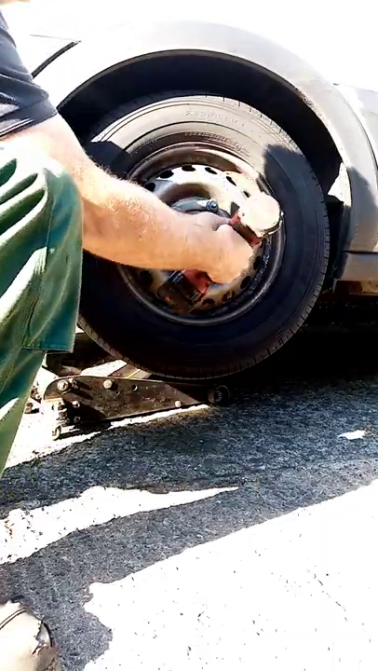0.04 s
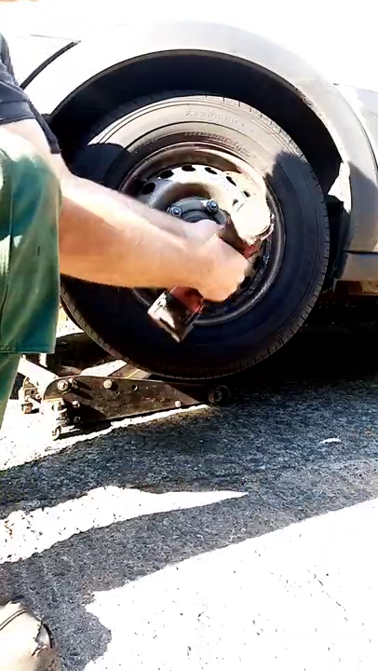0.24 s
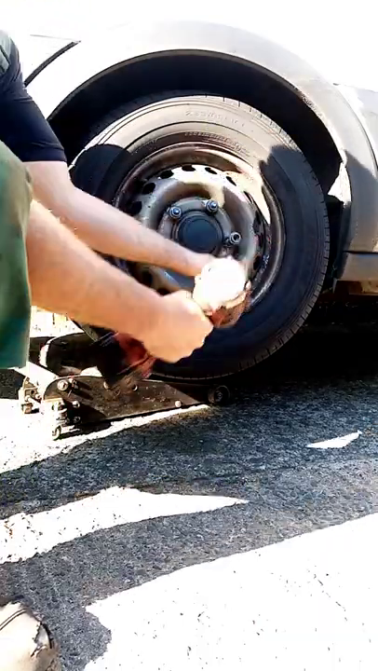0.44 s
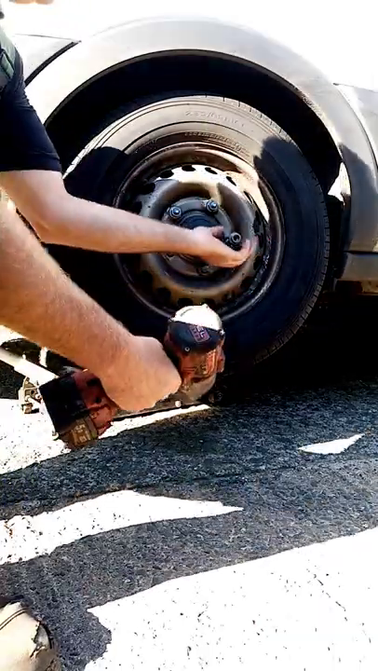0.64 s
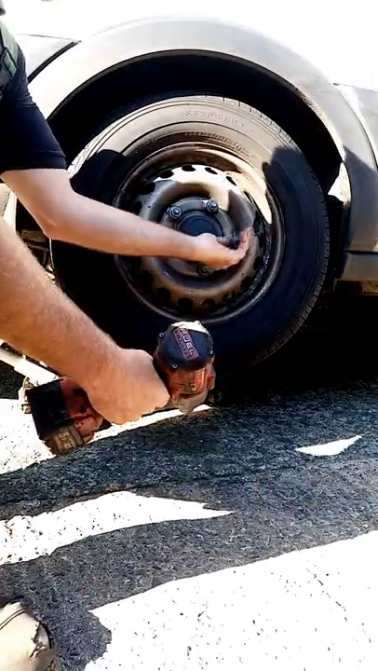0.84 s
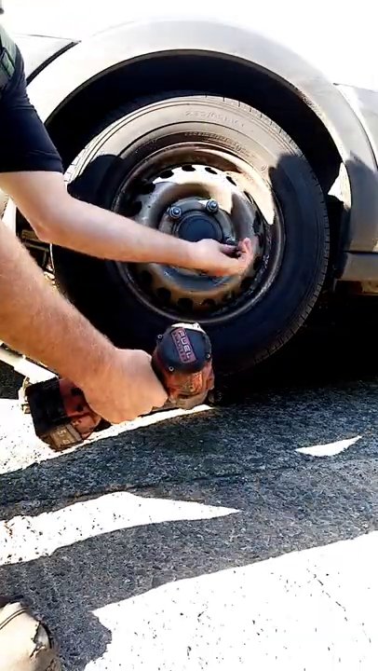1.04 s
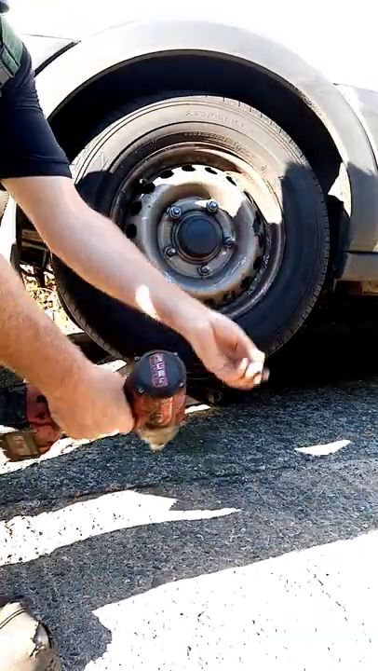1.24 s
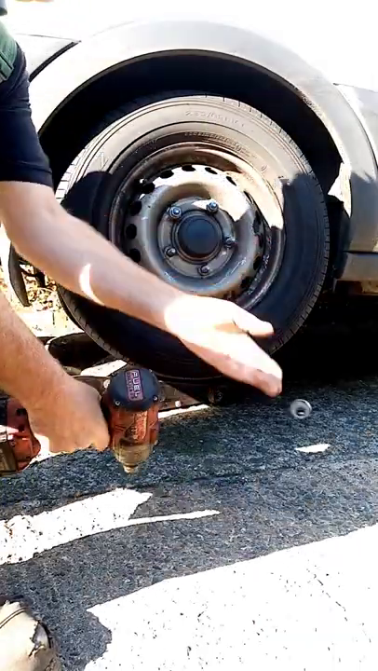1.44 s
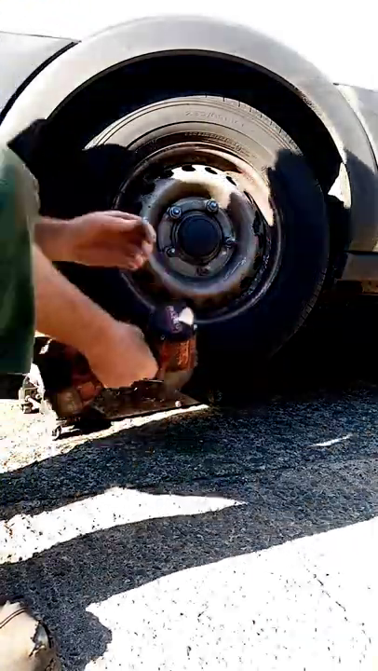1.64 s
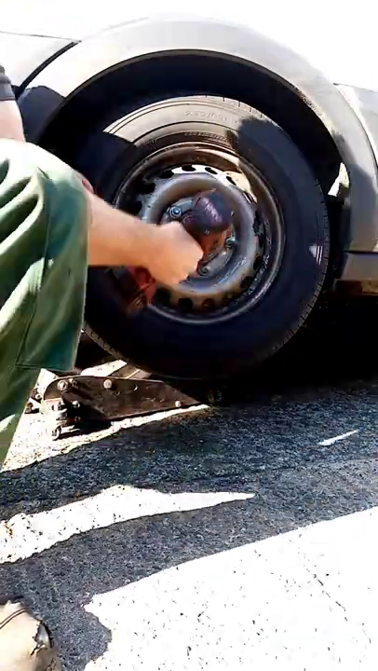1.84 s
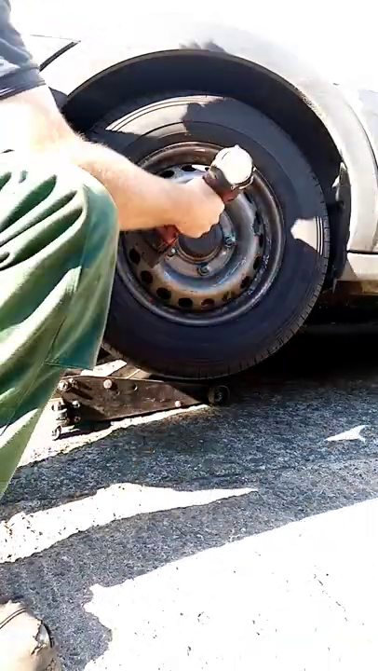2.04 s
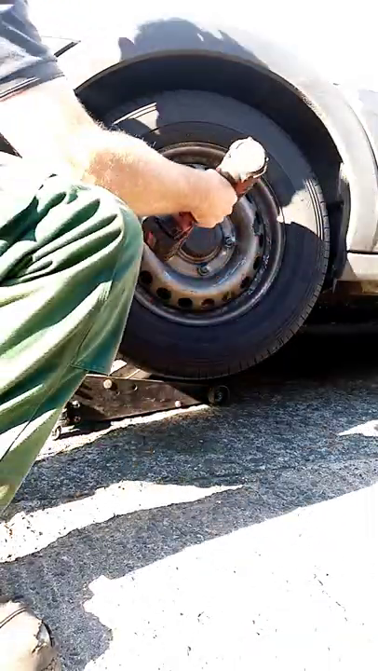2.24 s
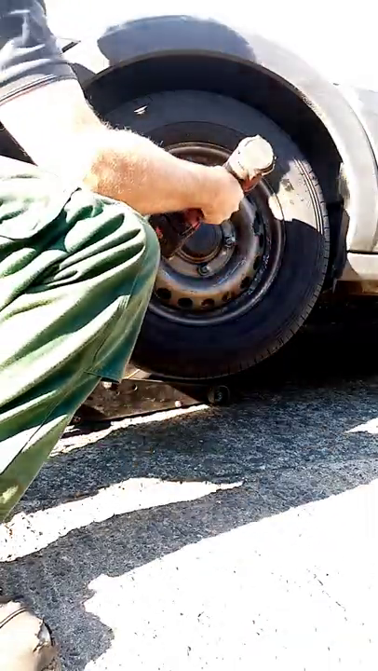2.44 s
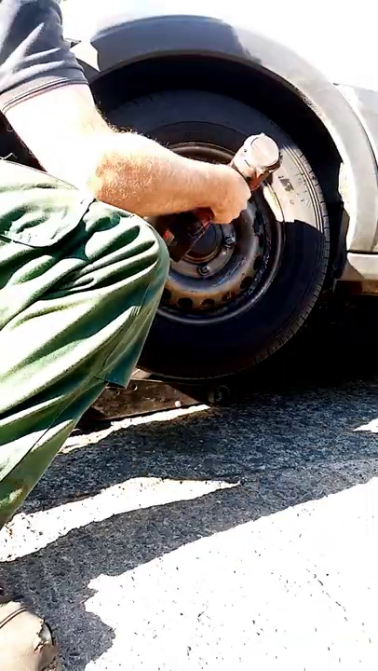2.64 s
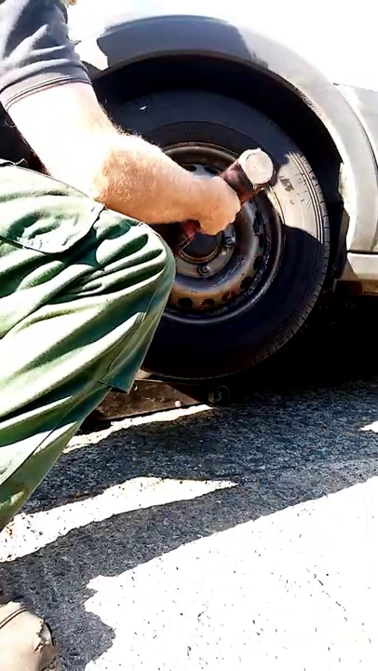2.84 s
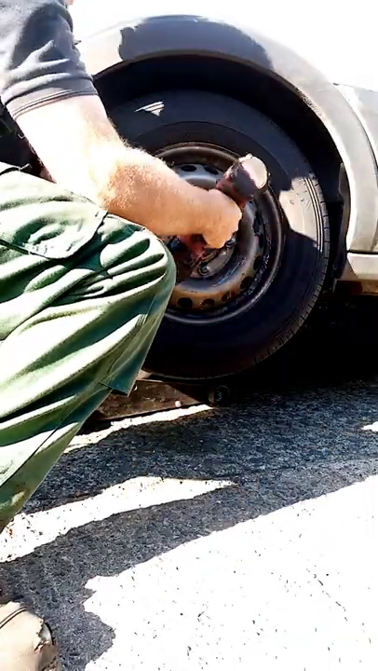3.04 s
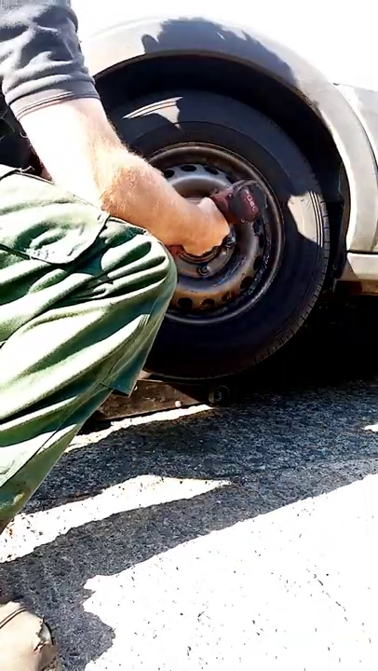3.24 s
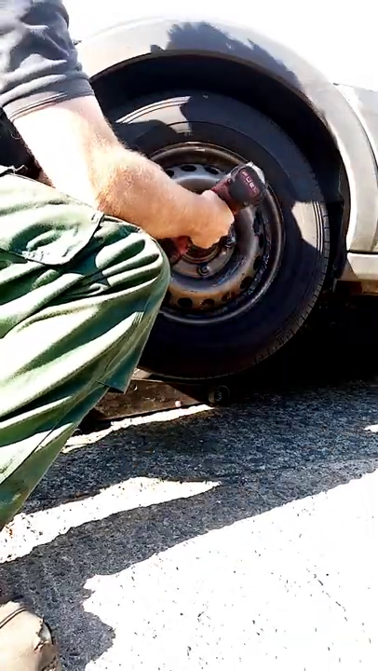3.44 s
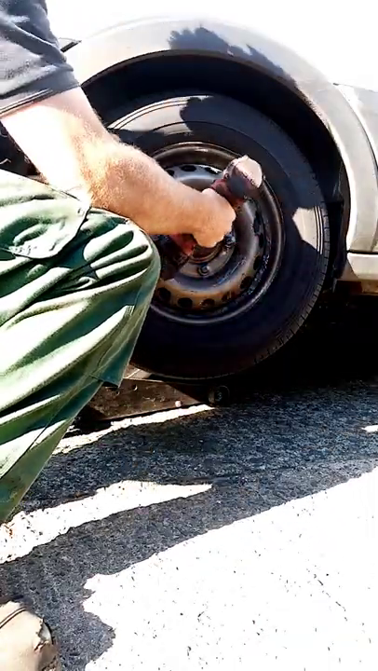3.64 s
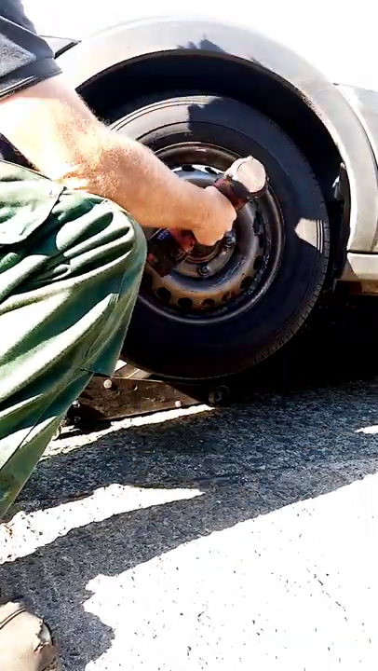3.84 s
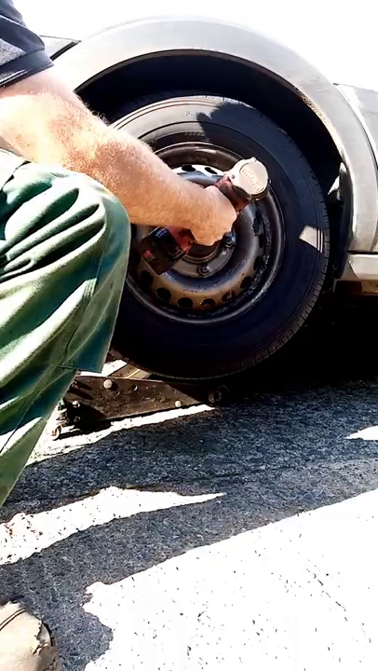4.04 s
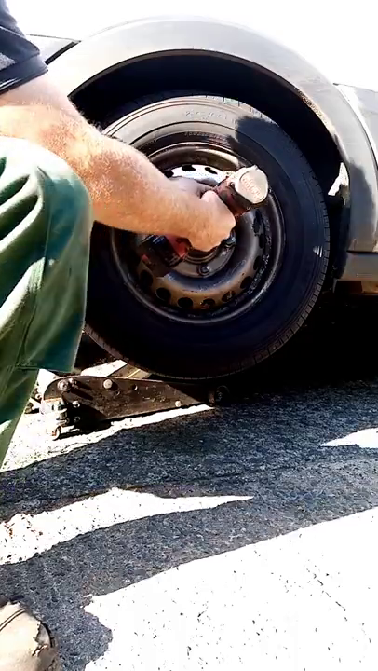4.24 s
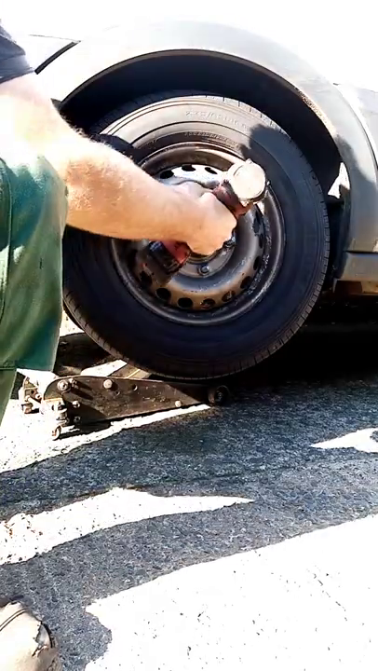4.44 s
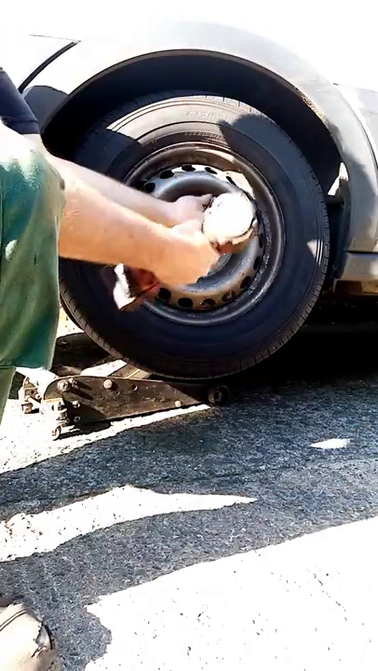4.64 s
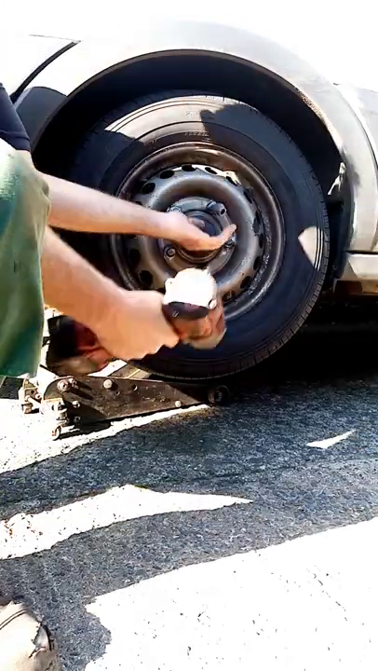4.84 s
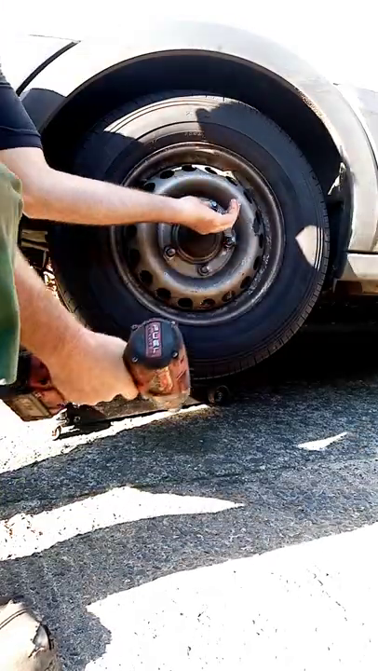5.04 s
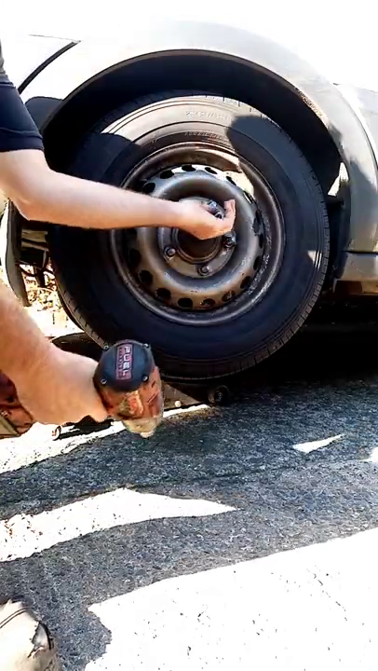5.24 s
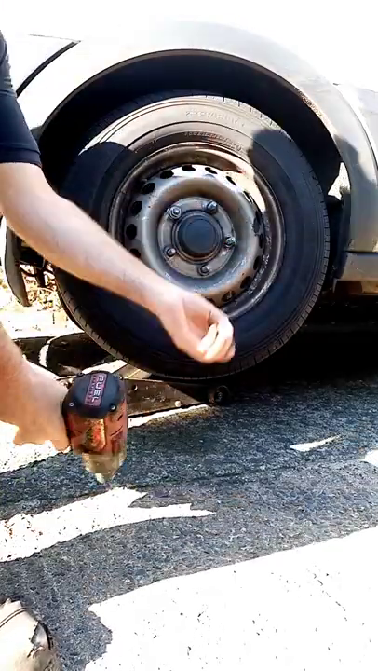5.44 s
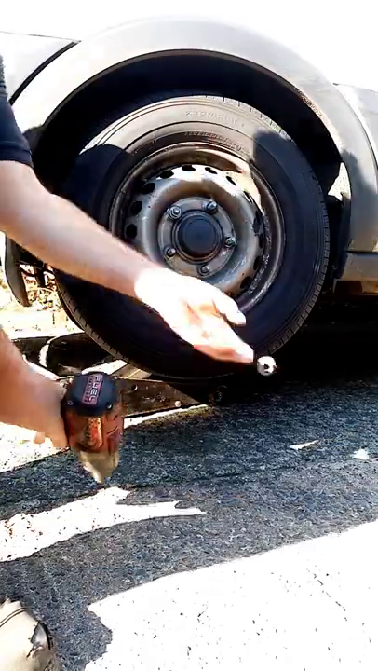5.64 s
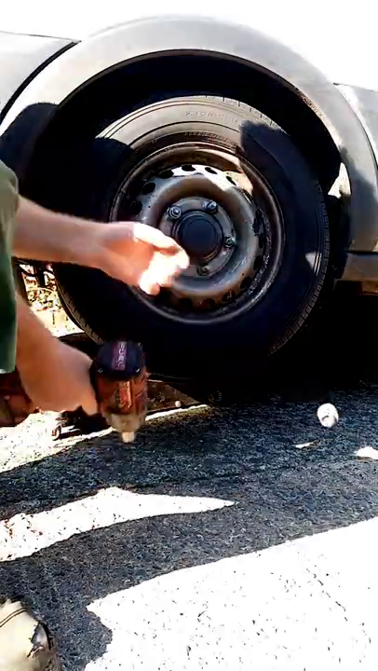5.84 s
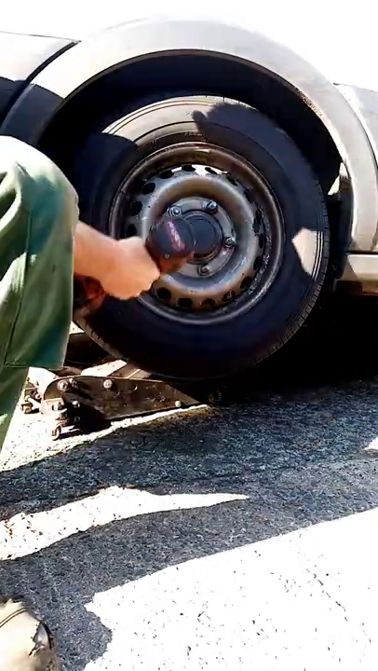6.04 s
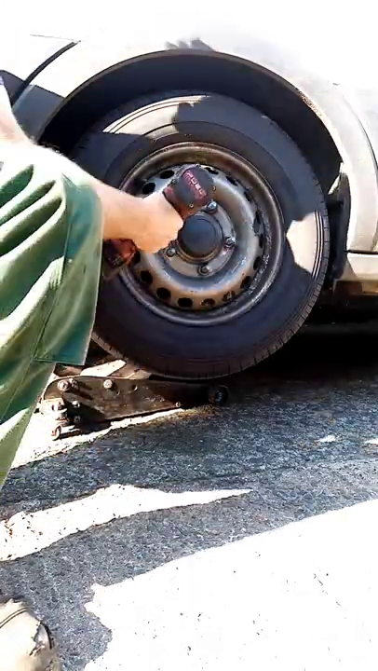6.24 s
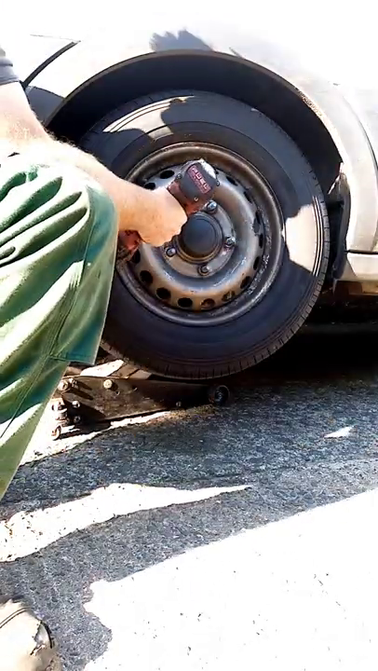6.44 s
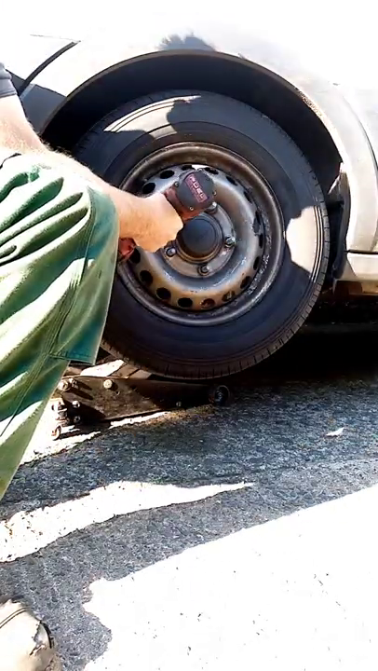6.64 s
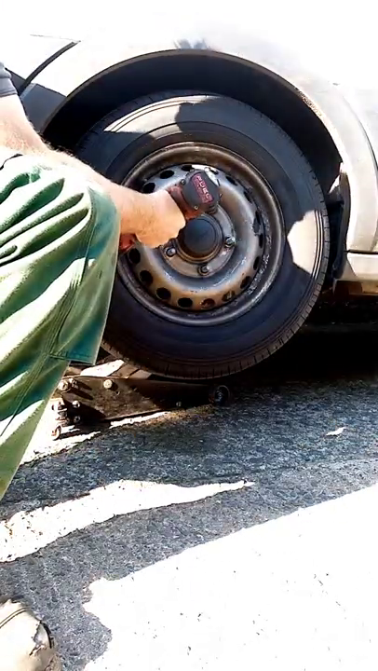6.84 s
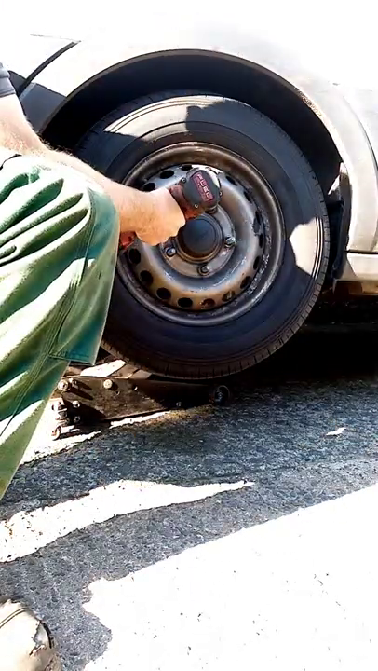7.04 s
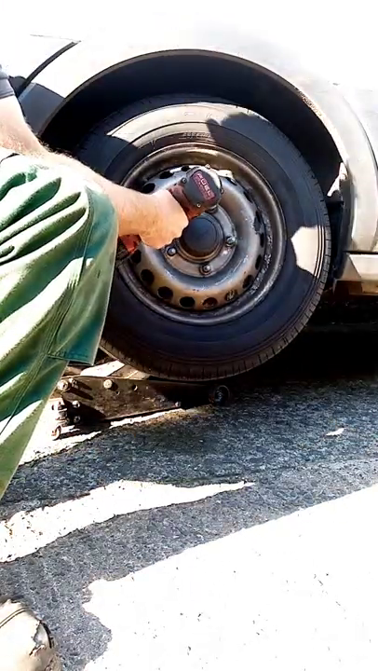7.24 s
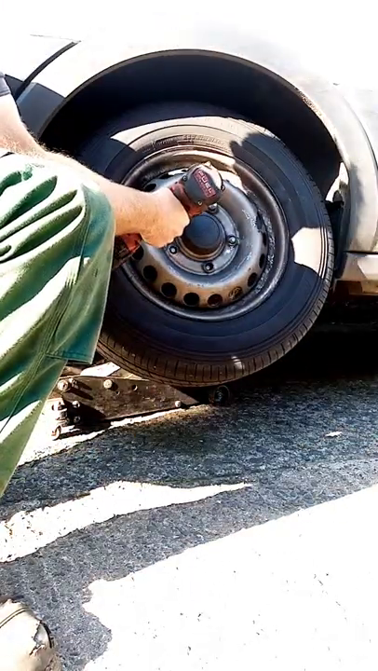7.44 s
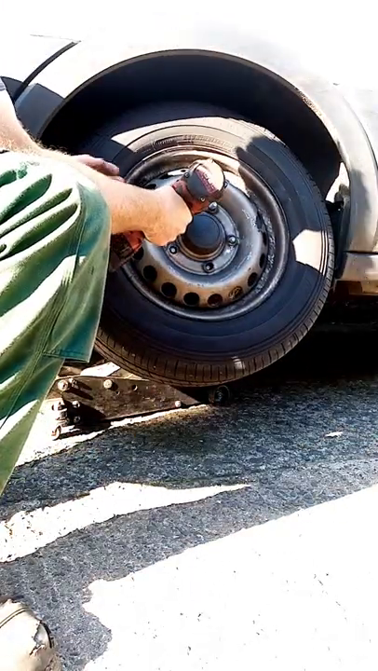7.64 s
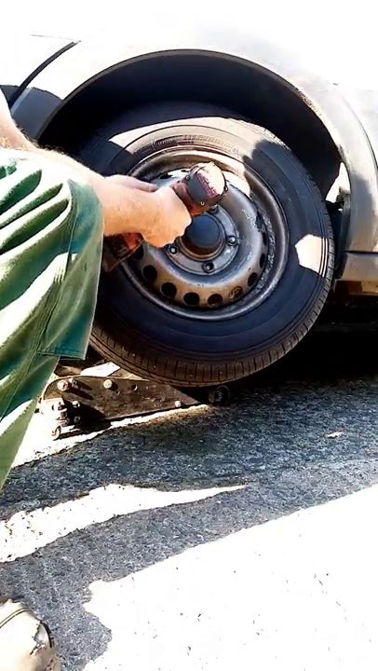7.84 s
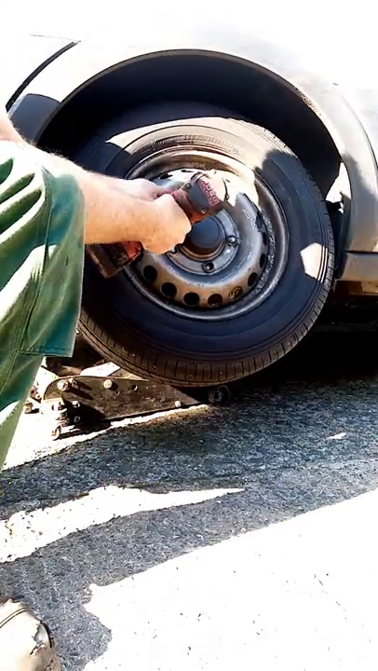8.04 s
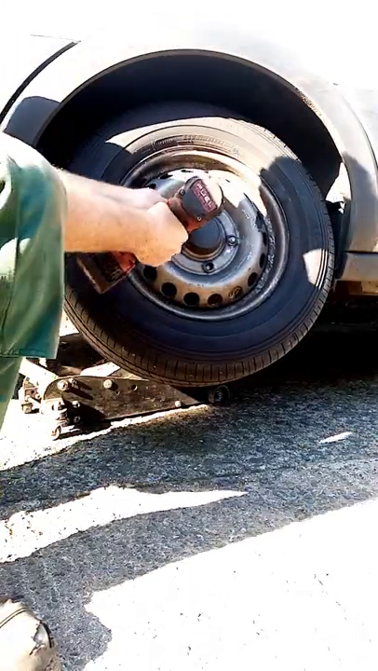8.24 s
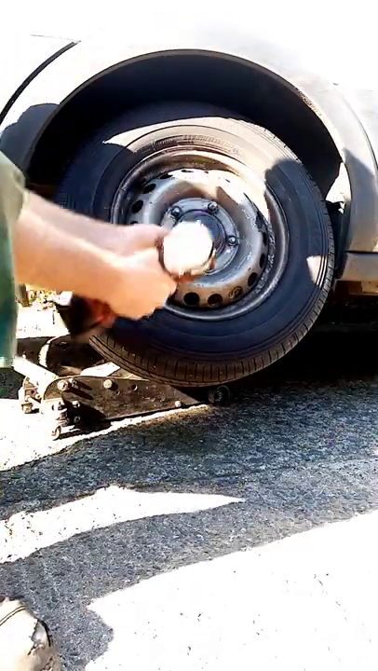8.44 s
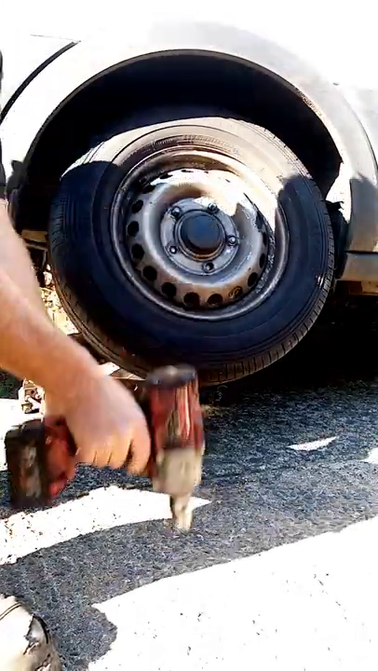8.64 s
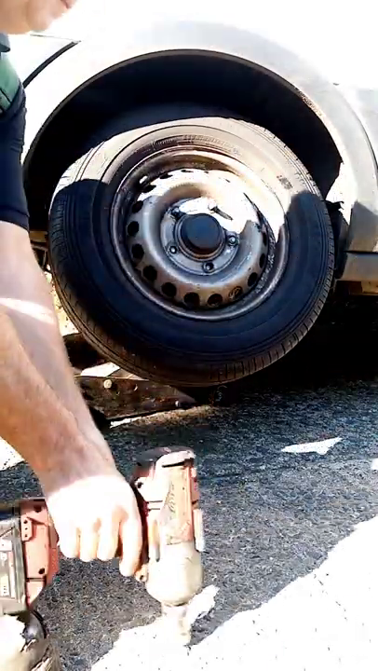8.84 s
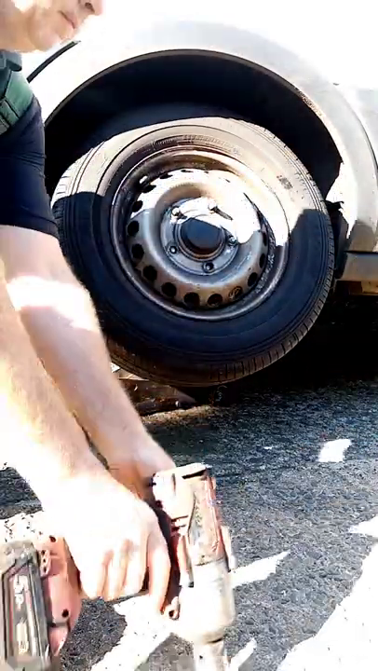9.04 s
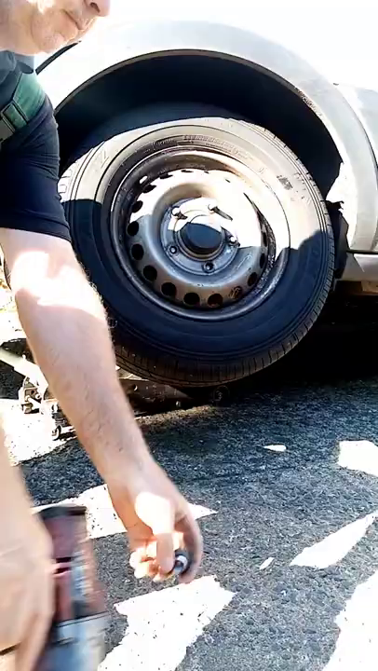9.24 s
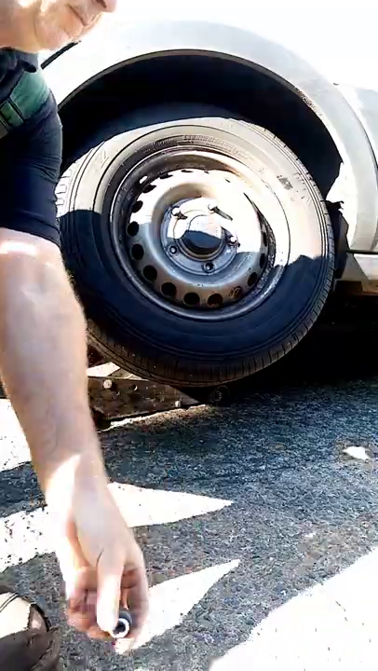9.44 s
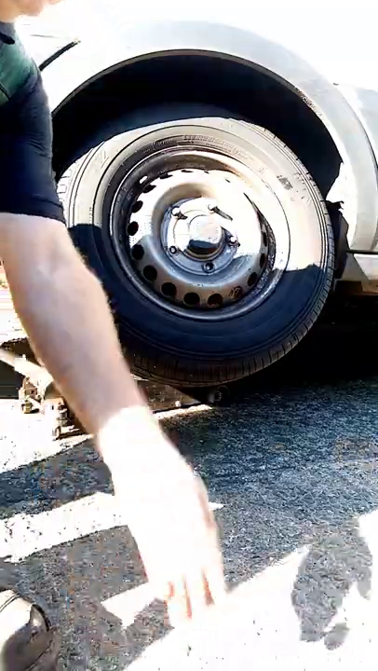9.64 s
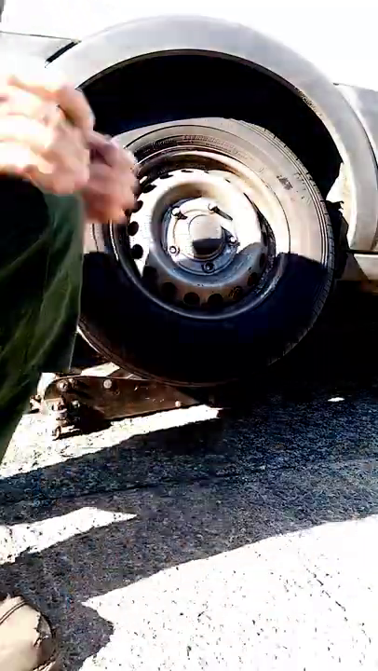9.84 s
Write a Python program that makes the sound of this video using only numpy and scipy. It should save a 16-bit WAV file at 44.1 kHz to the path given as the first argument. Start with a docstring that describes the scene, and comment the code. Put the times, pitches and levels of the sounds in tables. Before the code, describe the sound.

A worker removes wheel nuts with a battery impact wrench. Faint clicks and cloth rustle, then a nut clicks on the road and the socket clanks against steel. A fierce metallic hammering of about a third of a second gives way to a high gear whirr that slides down. The same cycle repeats after a quieter pause, ending in loose metallic knocks. Dry, close stereo sound outdoors with deep soft rumble.

```python
"""A cordless impact wrench takes two nuts off a steel van wheel: blows crack and ring the steel, gears whirr and coast.
Outdoors beside the van: knocks, taps, scrapes, tossed nuts and wheel bumps are noise bursts and ringing modes.
Cloth rustle, handling rumble, outdoor air and a deep rumble are coloured noise.
Two unlike microphones hear it, the left one first, with short echoes from wheel, ground and van."""
import sys
import numpy as np
from scipy import signal
from scipy.fft import rfft, irfft, next_fast_len
from scipy.io import wavfile
from scipy.ndimage import uniform_filter1d, map_coordinates

SR = 44100
rng = np.random.default_rng(int(sys.argv[2]) if len(sys.argv) > 2 else 0)


def unload_audio(sound):
    """Save the sound as a 16-bit wav file, at the path given as the first command line argument."""
    columns = np.transpose(np.atleast_2d(sound))
    # keep every value between -1 and 1, then stretch to whole-number steps
    steps = np.round(np.clip(columns, -1, 1) * 32767)
    wavfile.write(sys.argv[1], SR, steps.astype(np.int16))


N = 436590
TIME = np.arange(N) / SR
# Table levels are relative: trims, random swings and the microphones act on them later.


def amp(db):
    """Decibels to gain."""
    return 10 ** (np.asarray(db) / 20)


def unit(x):
    """Scale to rms 1."""
    return x / np.sqrt(np.mean(x ** 2) + 1e-20)


def along(points, hz):
    """Read a curve of (f/Hz, value) points on a log frequency axis."""
    f, v = np.transpose(points)
    return np.interp(np.log(hz + 1), np.log(f + 1), v)


def wobble(rate):
    """A smooth random curve with this many knots a second."""
    return map_coordinates(rng.standard_normal(int(N * rate / SR) + 4), [TIME * rate])


def fade(t, t60):
    """Exponential decay by 60 dB in t60 seconds."""
    return np.exp(-np.log(1000) * t / t60)


def filtered(x, response):
    """Multiply the spectrum of x by a function of frequency."""
    m = next_fast_len(N + SR // 2)
    return irfft(rfft(x, m) * response(np.fft.rfftfreq(m, 1 / SR)), m)[..., :N]


def coloured(x, spectrum, size=4096):
    """Pass x through a causal minimum-phase filter of unit energy with this spectrum."""
    cepstrum = irfft(np.log(amp(along(spectrum, np.fft.rfftfreq(size, 1 / SR)))))
    # folding the cepstrum forward in time makes the filter causal
    cepstrum[1:size // 2] *= 2
    cepstrum[size // 2 + 1:] = 0
    kernel = irfft(np.exp(rfft(cepstrum)))
    return signal.fftconvolve(x, kernel / np.linalg.norm(kernel))[:N]


def shaped(x, spectrum):
    """Give x this spectrum and rms 1."""
    return unit(filtered(x, lambda hz: amp(along(spectrum, hz))))


def noise(spectrum):
    """Steady coloured noise of rms 1."""
    return shaped(rng.standard_normal(N), spectrum)


def add(track, s, sound):
    """Mix a sound into the track at time s."""
    start = max(0, round(s * SR))
    track[start:start + len(sound)] += sound[:N - start]


def burst(rise, t60, tail_db, tail_t60):
    """The noise of one contact: a sharp crack, then the struck parts shiver."""
    t = TIME[:SR // 3]
    onset = 1 - np.exp(-(t / rise) ** 2)
    decay = fade(t, t60) + amp(tail_db) * fade(t, tail_t60)
    return rng.standard_normal(len(t)) * onset * decay


def strokes(rows, attack, release):
    """A gain curve: each (t/s, length/s, level/dB) row swells, holds and dies away."""
    gain = 0
    for s, length, db in rows:
        swell = np.clip((TIME - s) / attack, 0, 1)
        gain = gain + amp(db) * swell * fade(np.clip(TIME - s - length, 0, 2 * release), release)
    return gain


def rumble(spectrum):
    """Low stereo noise: an added side signal makes the two channels unlike, by frequency."""
    mid = noise(spectrum)
    side_db = [(40, -1.0), (80, -3.5), (150, -3.5), (300, 6.5)]
    side = filtered(noise(spectrum), lambda hz: amp(along(side_db, hz)))
    return np.array([mid + side, mid - side])


# the place over time: t/s, outdoor air level/dB, rumble level/dB
BACKGROUND_LEVELS = [(0, -76, -55.5), (1.2, -74, -61.5), (1.548, -75.5, -63), (2.4, -68, -55.5),
                     (4.5, -67, -64), (5.2, -72.5, -60.5), (5.7, -75, -64.5), (6.1, -70, -59.5),
                     (8.4, -72, -53), (9.9, -58, -54)]
# colour of the outdoor air: f/Hz, density level/dB per Hz
AIR_COLOUR = [(150, -16.5), (300, -14), (480, -8.5), (620, -13), (850, -5), (1050, -0.5), (1500, -20.5),
              (3000, -23), (9000, -29), (16000, -36)]
# colour of the deep outdoor rumble: f/Hz, density level/dB per Hz
DEEP_COLOUR = [(12, -60.5), (20, -29), (32, -24), (47, -9.5), (70, -1), (166, -5.5), (189, -10.5),
               (400, -37), (520, -70.5), (880, -120)]


def background(floor_db=0, air_db=0, uneven_db=1.0):
    """A deep uneven rumble under outdoor air that is partly shared by the two microphones."""
    s, *levels = np.transpose(BACKGROUND_LEVELS)
    air_gain, floor_gain = (amp(np.interp(TIME, s, db)) for db in levels)
    shared, apart = noise(AIR_COLOUR), np.array([noise(AIR_COLOUR), noise(AIR_COLOUR)])
    air = unit(shared + apart) * amp(air_db + 1.0 * wobble(3.3))
    deep = amp(floor_db + uneven_db * wobble(16)) * rumble(DEEP_COLOUR)
    return floor_gain * deep + air_gain * air


# wheel and van handled and leant on: t/s, length/s, level/dB
SHOVES = [(0, 0.32, -53), (.59, 0.03, -58), (.8, 0.021, -50.5), (2.04, .1, -43.5), (2.69, 0.11, -43),
          (3.02, .62, -40), (3.37, .07, -41), (3.7, .18, -46), (6.28, 0.17, -42.5), (6.61, 0.39, -44),
          (7.03, .75, -49), (7.25, 0.11, -41), (8.54, 0.06, -45), (9.14, 0.37, -48.5)]
# colour of their rumble: f/Hz, density level/dB per Hz
SHOVE_COLOUR = [(15, -50), (25, -34), (38, -30.5), (60, -13.5), (100, 1), (140, 3.5), (200, -9.5),
                (260, -14.5), (400, -30), (700, -41), (1500, -81)]


def shoves(shove_db=0, uneven_db=2.5):
    """Wheel and van rumble unevenly while they are handled."""
    gain = amp(shove_db + uneven_db * wobble(15)) * strokes(SHOVES, attack=.035, release=0.55)
    return gain * rumble(SHOVE_COLOUR)


def from_left(x, lag=0.0011746):
    """Sound reaches the left microphone first, by lag seconds: some 0.4 m of air."""
    return filtered(x, lambda f: np.exp(1j * np.pi * f * lag * np.array([[1], [-1]])))


# echo decay off the van: f/Hz, t60/s
ECHO_T60 = [(150, 0.092), (800, 0.27), (2100, 0.18), (5500, 0.2), (14000, 0.04)]


def place(x, near_db, echo_db, near_t60=.02, size=2048):
    """Wheel and ground scatter a sound at once, the van a little longer; paths shift as the worker moves."""
    wet, t = np.zeros((2, N)), TIME[:SR // 4]
    hz, frames, _ = signal.stft(t, SR, nperseg=256)
    for start in range(0, N, size):  # new random paths for every block
        z = signal.stft(rng.standard_normal((2, len(t))), nperseg=256)[2]
        decay = fade(frames, along(ECHO_T60, hz)[:, None])
        tail = signal.istft(z * decay, nperseg=256)[1][:, :len(t)]
        near = rng.standard_normal((2, len(t))) * fade(t, near_t60)
        paths = amp(near_db) * near / np.linalg.norm(near[0]) + amp(echo_db) * tail / np.linalg.norm(tail[0])
        for track, path in zip(wet, paths):
            add(track, start / SR, signal.fftconvolve(x[start:start + size], path))
    return (from_left(x) + wet) / np.sqrt(1 + amp(near_db) ** 2)


# a nut slides in the socket: t/s, length/s, level/dB
SLIDES = [(.32, 0.045, -58), (4.62, 0.051, -50.5), (4.77, 0.06, -68)]
# the tool grinds on wheel or ground: t/s, length/s, level/dB
SCRAPES = [(2.56, 0.043, -47), (2.625, 0.021, -30), (2.95, 0.047, -40), (3.1, 0.049, -35),
           (9.195, 0.18, -44.5), (9.295, 0.054, -34)]
# clothes move: t/s, length/s, level/dB
RUSTLES = [(1.05, 0.12, -78.5), (1.2, 0.22, -77.5), (1.95, 0.12, -74.5), (2.5, 0.27, -76),
           (2.97, 0.15, -46), (4.53, 0.14, -71.5), (4.77, 0.056, -68), (6.25, .27, -60.5), (8.4, 0.41, -78),
           (8.8, .35, -73), (9.27, 0.36, -63.5), (9.66, 0.19, -63)]
# colour of the sliding nut: f/Hz, density level/dB per Hz
SLIDE_COLOUR = [(350, -61), (600, -27), (886, 0), (1460, -18), (1730, -4.5), (2050, -16), (2550, -8.5),
                (2880, -13.5), (4640, -22), (5110, -21.5), (5560, -26), (6360, -21.5), (11000, -46.5),
                (14300, -76), (22000, -120)]
# colour of the grinding tool: f/Hz, density level/dB per Hz
SCRAPE_COLOUR = [(180, -37), (300, -3.5), (366, -14), (434, -18.5), (588, -21), (1110, -3), (1400, -19),
                 (2030, -19), (2340, -32), (2710, -13.5), (3350, -33.5), (7000, -49.5), (9100, -69),
                 (15400, -120)]
# colour of the cloth: f/Hz, density level/dB per Hz
CLOTH_COLOUR = [(1760, -47.5), (3000, -12), (4140, -6), (7830, -3.5), (11700, -18), (13300, -31.5),
                (14900, -15.5), (16000, -21)]


def handling(slide_db=3, sing_db=-4, scrape_db=0, cloth_db=0, grain_db=3.5, fold_db=2.5):
    """Steel slides and grinds in small grains, making the socket sing faintly; sleeves and trousers rustle."""
    def grains():
        return unit(amp(grain_db * wobble(220)))

    singing = noise([(2200, -41.5), (2460, -14.5), (2503, 3.5), (2550, -10.5), (2850, -43.0)])
    sliding = amp(slide_db) * noise(SLIDE_COLOUR) * grains() + amp(sing_db) * singing
    slide = strokes(SLIDES, attack=0.027, release=0.74) * sliding
    grinding = noise(SCRAPE_COLOUR) * grains()
    scrape = amp(scrape_db) * strokes(SCRAPES, attack=0.011, release=0.069) * grinding
    rustling = noise(CLOTH_COLOUR) * unit(amp(fold_db * wobble(130)))
    cloth = amp(cloth_db) * strokes(RUSTLES, attack=.08, release=0.94) * rustling
    return slide + scrape + cloth


# soft taps of hand and tool on the rim: t/s, level/dB, thud above the tap level/dB
TAPS = [(0.262, -45, -10), (0.992, -43, -4), (1.873, -13.5, -16), (2.646, -15.5, -21.5), (2.839, -33, -16),
        (2.955, -25.5, -20.5), (3.15, -6, -20), (4.461, -26.5, -8), (4.551, -28.5, -32), (4.76, -24.5, -8),
        (4.86, -14, -21.5), (5.035, -23, -6.5), (5.249, -44, 1), (7.236, -12.5, -11), (9.301, -18.5, -23),
        (9.333, -21.5, -20)]
# colour of a tap: f/Hz, density level/dB per Hz
TAP_COLOUR = [(240, -36), (420, -10), (640, -10.5), (850, 2), (1030, 5), (1400, -15), (1720, -8),
              (2100, -19), (3000, -28.5), (6800, -34), (11000, -57)]
# colour of the thuds under taps and knocks: f/Hz, density level/dB per Hz
THUD_COLOUR = [(50, -44.5), (120, -11), (200, -8), (330, 1.5), (480, -4), (800, -16.5), (2000, -57)]


def taps(tap_db=-3, thud_db=-7):
    """A cushioned contact swells for a moment and dies quickly, over a softer thud."""
    contacts, thuds = np.zeros((2, N))
    for s, db, thud in TAPS:
        add(contacts, s, amp(db) * burst(rise=0.00065, t60=0.017, tail_db=-25.0, tail_t60=0.083))
        add(thuds, s, amp(db + thud) * burst(rise=0.0018, t60=0.06, tail_db=-18.0, tail_t60=.15))
    return amp(tap_db) * coloured(contacts, TAP_COLOUR) + amp(thud_db) * coloured(thuds, THUD_COLOUR)


# a tossed nut lands and skips over the asphalt: t/s, level/dB
LANDINGS = [(1.6321, -15.5), (1.737, -26.5), (1.8833, -11), (1.9893, -7.5), (5.8691, -15.5), (5.9611, -41),
            (6.0289, -42), (6.1224, -33), (6.1799, -41)]
# colour of the nut: f/Hz, density level/dB per Hz
NUT_COLOUR = [(350, -47.5), (600, -23), (1080, -12), (1640, -21.5), (1930, -4.5), (2680, -11), (4050, 1.5),
              (4400, -10.5), (5120, -3), (8620, -17.5), (13200, -45.5), (14900, -28.5), (16000, -45.5)]


def tossed_nuts(nut_db=0):
    """Steel on asphalt: a short hard click at every landing."""
    clicks = np.zeros(N)
    for s, db in LANDINGS:
        add(clicks, s, amp(db) * burst(rise=0.000097, t60=0.007, tail_db=-24, tail_t60=0.17))
    return amp(nut_db) * coloured(clicks, NUT_COLOUR)


# hard contacts of socket, tool and wheel: t/s, click level/dB, clank and thud above the click level/dB
KNOCKS = [(0.0034, -23.5, -10, -43), (0.1206, -32, -9, -45), (0.7801, -26.5, -12.5, -48),
          (0.8011, -51, 14.5, -22), (2.0326, -10, -2.5, -12.5), (2.0791, -16.5, 0.5, -30),
          (2.0998, -12.5, -7.5, -14), (2.1449, -20.5, -11, -16), (2.2799, -44.5, -16, -12),
          (2.6234, -41, 5, -31), (2.696, -13, -1.5, -21), (2.806, -30, 2.5, -7.5), (2.819, -23, -2, -9.5),
          (2.966, -21.5, 0, -5), (3.0365, -11, 1, -4), (6.2367, -41, -10, -23), (6.2599, -6, -7.5, -16.5),
          (6.3657, -8, -3.5, -10), (8.0526, -20.5, -4, -35), (8.693, -7, -8.5, -32.5),
          (8.8416, -37.5, -34, -21.5), (9.4969, -16.5, -5.5, -18), (9.5526, -11.5, -4.5, -6.5),
          (9.5816, -21, -25, -36), (9.6267, -13, -8, -22), (9.6891, -7, -4, -7), (9.7184, -11, -5, -42),
          (9.7529, -21.5, -9, -40), (9.7666, -12, -8.5, -46), (9.784, -15.5, -6, -38),
          (9.825, -23.5, -29, -22)]
# colour of the click at the steel: f/Hz, density level/dB per Hz
CLICK_COLOUR = [(900, -42.5), (1800, -7), (3000, 2.5), (4500, -2.5), (7500, -4), (10000, -11), (13000, -32),
                (15200, -15), (16500, -34)]
# colour of the clank in the rim: f/Hz, density level/dB per Hz
CLANK_COLOUR = [(400, -21.5), (700, -13.5), (950, 0.5), (1150, -7), (1400, -15.5), (1800, -9.5),
                (2600, -20), (5000, -58)]


def knocks(click_db=-2, clank_db=1, thud_db=0):
    """A contact clicks at the steel, clanks in the rim and thuds in the tyre or the tool's body."""
    clicks, clanks, thuds = np.zeros((3, N))
    for s, db, clank, thud in KNOCKS + stop_clicks():
        add(clicks, s, amp(db) * burst(rise=.0004, t60=0.0071, tail_db=-18.5, tail_t60=0.16))
        add(clanks, s, amp(db + clank) * burst(rise=0.00079, t60=0.026, tail_db=-19, tail_t60=0.26))
        add(thuds, s, amp(db + thud) * burst(rise=0.00081, t60=0.0093, tail_db=-8.5, tail_t60=0.18))
    click, clank = coloured(clicks, CLICK_COLOUR), coloured(clanks, CLANK_COLOUR)
    return amp(click_db) * click + amp(clank_db) * clank + amp(thud_db) * coloured(thuds, THUD_COLOUR)


def ringing(hits, modes, rise):
    """Each hit sets the modes of one object ringing as decaying sines."""
    track, t = np.zeros(N), TIME[:SR]
    for s, db in hits:
        ring = 0
        for hz, level, t60 in modes:
            ring = ring + amp(level) * fade(t, t60) * np.sin(2 * np.pi * (hz * t + rng.random()))
        add(track, s, amp(db) * ring * (1 - np.exp(-t / rise)))
    return track


# the socket rings, as a nut slips out or a tossed nut strikes: t/s, level/dB
RING_HITS = [(.799, -28), (1.884, -37.5), (2.1, -39)]
# modes of the socket: f/Hz, level/dB, t60/s
SOCKET_MODES = [(2040, -18, .08), (2503, -10, .16), (2520, -13.5, 0.45), (6590, -30.5, 0.16)]


def socket_rings():
    """The socket rings as a nut slips out of it or a tossed nut strikes."""
    return ringing(RING_HITS, SOCKET_MODES, rise=0.00042)


# low thumps of wheel and tyre, two under the first hammering, one as the second nut comes free: t/s, level/dB
BUMPS = [(3.397, -31.5), (3.455, -32.5), (7.234, -21.5)]
# modes of wheel and tyre: f/Hz, level/dB, t60/s
TYRE_MODES = [(116, -14.5, 0.85), (210, -2.5, 1), (234, 3.5, 0.18), (271.4, -5, 0.13), (312, -7, 0.57),
              (375, 1.5, 0.13), (415, -4.5, 0.31), (443, -1, 0.23), (564.4, -3.5, 0.082), (760, -2.5, 0.13)]


def wheel_bumps():
    """Wheel and tyre boom with low thumps under the hammer and as the nut comes free."""
    return ringing(BUMPS, TYRE_MODES, rise=.003)


# motor speed as the pitch of its gear mesh, one list per run: t/s, f/Hz
MESH_PITCH = [
    [(3.09, 1694), (3.18, 3290), (3.5, 3417), (3.6, 4010), (3.75, 4146), (3.894, 4239), (4.03, 4250),
     (4.076, 4128), (4.41, 502.1)],
    [(6.49, 1200), (6.6, 3275), (7.02, 3391), (7.104, 3872), (7.164, 4038), (7.335, 4124), (7.37, 4043),
     (7.405, 4158), (7.842, 4142), (7.888, 3986), (8.19, 572.3)],
]


def speed():
    """Mesh pitch in Hz at every sample, 0 at rest."""
    return sum(np.interp(TIME, *np.transpose(run), left=0, right=0) for run in MESH_PITCH)


def coasting():
    """0 while the speed holds or rises, up to 1 while the motor slows down freely."""
    return np.clip(-np.gradient(uniform_filter1d(speed(), size=1500), TIME) / 8000, 0, 1)


# one row per nut: first blow t/s, last blow t/s, base level/dB, delay while the hammer gets up to speed/s,
# delay as the nut gives way/s, first and last blow above the base level/dB, final clicks t/s
RUNS = [(3.174, 3.5245, -3.5, .007, .0217, 1, -3, 4.3066), (6.5819, 7.0025, -2, .0116, .0096, -5, 0, 8.107)]


def load(unload_s=0.048):
    """1 from the pull of the trigger until the last blow on the nut, then falling to 0."""
    total = 0
    for pitch_points, (_, last, *_) in zip(MESH_PITCH, RUNS):
        pulled = TIME > pitch_points[0][0]
        total = total + pulled * np.exp(-np.clip(TIME - last, 0, 2) / unload_s)
    return total


def stop_clicks(first_db=-23, loss_db=3.5, gap_s=.03, clank_db=-16, thud_db=-37):
    """The hammer clicks twice more as it comes to rest: rows for knocks()."""
    return [(stop + k * gap_s, first_db - k * loss_db, clank_db, thud_db) for *_, stop in RUNS for k in range(2)]


def mesh_phase(flutter):
    """Gear teeth passed so far, at a speed with a slight random flutter."""
    return np.cumsum(speed() * (1 + flutter * wobble(120))) / SR


def gear_noise(teeth, repeat, apart, order=36):
    """Tooth noise: a share repeats with every turn and slides with the speed; the rest differs by side."""
    pattern = rng.standard_normal(order * 10)
    regular = map_coordinates(pattern, [teeth / order % 1 * len(pattern)], mode="grid-wrap")
    loose = unit(rng.standard_normal(N) + apart * rng.standard_normal((2, N)))
    share = np.clip(repeat, 0, 1)
    return np.sqrt(share) * regular + np.sqrt(1 - share) * loose


# the faster the gears, the louder: mesh pitch f/Hz, whirr level/dB, rattle level/dB
GEAR_LEVEL = [(500, -78.5, -77.5), (1850, -49.5, -59.5), (2380, -33.5, -38.5), (3630, -26.5, -34),
              (4273, -25, -32.5)]
# pitches the housing favours, so the mesh tone and its octave swell in passing: f/Hz, level/dB to the whirr
HOUSING = [(2000, -35), (3000, -9), (3400, -12), (3750, -13.5), (4000, 1), (4140, -4.5), (4200, -1),
           (4300, -7), (5000, -29.5), (7750, -16.5), (8030, 0), (8200, -22), (8340, -20.5), (8480, -4)]
# weaker gear tones: multiple of the mesh pitch, level/dB to the whirr under power, the same while coasting
GEAR_TONES = [(.238, -25.5, -26), (.278, -17, -13.5), (.35, -18.5, -16), (.603, -22.5, -9),
              (.72, -22.5, -14.5), (1, -32, -13), (1.222, -19.5, -29), (1.54, -22.5, -14)]
# colour of the whirring gears: f/Hz, density level/dB per Hz
WHIRR_COLOUR = [(280, -28.5), (340, -21.5), (420, -28), (600, -25.5), (830, -9), (980, 0.5), (1180, -9.5),
                (1470, -8.5), (1750, -14), (2120, -18), (2500, -11.5), (3350, -14.5), (3700, -17),
                (4100, -14.5), (5200, -32.5), (8800, -100)]
# colour of the chattering loose socket: f/Hz, density level/dB per Hz
RATTLE_COLOUR = [(2150, -34), (3000, -7.5), (3750, -23.5), (4140, -20.5), (4290, -23), (4410, -13.5),
                 (4660, -12), (6390, -7.5), (8110, -11), (13200, -28), (14900, -16), (16000, -37)]


def motor(whirr_db=0, rattle_db=2, mesh_db=-3, loaded_db=-7, waver_db=1.0, surge_db=1.35, chatter_db=0.3,
          blur=.6, lean_db=2.0):
    """Gears whirr and whine with speed, the loose socket chatters; load quiets the gears, coasting shifts their tones."""
    teeth, pitch, coast = mesh_phase(flutter=.0025), speed(), coasting()
    pitches, *levels = np.transpose(GEAR_LEVEL)
    whirr, rattle = (amp(np.interp(pitch, pitches, db)) * (pitch > 0) for db in levels)
    whirr = whirr * amp(loaded_db * load() + surge_db * wobble(40))

    def tone(k, slack):  # slack: random phase wander in radians
        sine = np.sin(2 * np.pi * k * teeth + slack * wobble(130))
        return np.sqrt(2) * sine * unit(amp(waver_db * wobble(60)))

    def housed(k, slack):
        return amp(along(HOUSING, k * pitch)) * whirr * tone(k, slack)

    body = amp(whirr_db) * whirr * shaped(gear_noise(teeth, repeat=.3, apart=0.97), WHIRR_COLOUR)
    fizz = amp(rattle_db) * rattle * shaped(gear_noise(teeth, repeat=0.028, apart=3.4), RATTLE_COLOUR)
    left_lean = amp([[lean_db], [-lean_db]])
    whine = amp(mesh_db) * (housed(1, slack=.12) * left_lean + housed(2, slack=.25))
    lesser = 0
    for k, driven, free in GEAR_TONES:
        lesser = lesser + whirr * amp(driven + (free - driven) * coast) * tone(k, blur)
    return (body + fizz) * unit(amp(chatter_db * wobble(350))) + whine + lesser


PERIOD_S, SCATTER_DB = .0266, 1.84  # steady hammering
SETTLE_BLOWS, GIVE_BLOWS = 0.55, 1.7  # blows it takes to settle, and for the nut to give way
BITE_DB, BITE_BLOW, BITE_WIDTH = 3, 2.8, 2  # extra level early on: dB, at which blow, over how many


def blows():
    """(t/s, level/dB) of the hammer: a steady beat, shifted at its start and as the nut gives way."""
    hits = []
    for first, last, db, start_delay, end_delay, first_db, last_db, _ in RUNS:
        steady = last - first - start_delay - end_delay
        k = np.arange(round(steady / PERIOD_S) + 1)
        starting, giving = np.exp(-k / SETTLE_BLOWS), np.exp((k - k[-1]) / GIVE_BLOWS)
        times = first + steady * k / k[-1] + start_delay * (1 - starting) + end_delay * giving
        bite_db = BITE_DB * np.exp(-((k - BITE_BLOW) / BITE_WIDTH) ** 2)  # the socket bites
        scatter = SCATTER_DB * rng.standard_normal(len(k))
        hits += zip(times, db + bite_db + first_db * starting + last_db * giving + scatter)
    return hits


# colour of a blow: f/Hz, density level/dB per Hz
BLOW_COLOUR = [(53, -36), (90, -24), (323, -8.5), (488, -17), (721, -14.5), (896, -2), (1380, -16),
               (1750, -7.5), (2380, -13), (2650, -7.5), (6580, -8.5), (9110, -11), (13500, -26.5),
               (15000, -11), (16000, -35.5)]
# modes of socket, stud and rim under the hammer: f/Hz, level/dB
STEEL_MODES = [(1717, -45.5), (1750, -57.5), (2842, -48), (3623, -48.5), (4000, -42), (4527, -54.5),
               (4980, -59), (5200, -54), (5405, -56.5), (5550, -48.5), (6158, -42), (6465, -45.5),
               (7127, -43.5), (7623, -53), (7903, -46), (8177, -72), (8317, -50.5), (8446, -43.5),
               (8963, -52.5), (9372, -49), (11170, -50.5), (11283, -55)]


def hammer(crack_db=-2, contact=.0017, shiver_db=-26, shiver_t60=0.39, ring_db=-31, ring_t60=.2, scatter_db=3):
    """Some 37 blows a second: each cracks at the socket, shivers the wheel and rings the steel at new strengths."""
    cracks, rings, t = np.zeros(N), np.zeros(N), TIME[:SR // 4]
    hz, level = np.transpose(STEEL_MODES)
    hits = blows()
    usual_db = np.mean([db for _, db in hits])
    for s, db in hits:
        crack = amp(db + crack_db) * t / contact * np.exp(-t / contact)
        shiver = amp((db + usual_db) / 2 + shiver_db) * fade(t, shiver_t60)  # evener than the blows
        add(cracks, s - contact / 2, (crack + shiver) * rng.standard_normal(len(t)))
        sizes = amp(level - level.max() + scatter_db * rng.standard_normal(len(hz)))
        modes = np.sin(2 * np.pi * (np.outer(hz, t) + rng.random((len(hz), 1))))
        add(rings, s, amp(db) * (sizes @ modes) * fade(t, ring_t60))
    return coloured(cracks, BLOW_COLOUR) + amp(ring_db) * rings


def scene():
    """The surroundings, the handwork and the tool as they reach the two microphones."""
    contacts = knocks() + tossed_nuts() + taps() + handling()
    handwork = place(contacts, near_db=8.0, echo_db=-6.0, near_t60=0.021)
    direct = from_left(motor() + socket_rings() + wheel_bumps())
    hammering = place(hammer(), near_db=1.0, echo_db=-3, near_t60=0.0072)
    return background() + shoves() + handwork + direct + hammering


# left minus right microphone: f/Hz, level/dB
MICROPHONE_LEAN = [(50, 6), (130, -0.5), (250, -4.5), (450, -5), (650, -5.5), (850, -13.5), (1030, -19),
                   (1300, -7), (1700, 0), (2200, -3), (3800, 2.5), (7500, -0.5), (9500, -8.5), (13000, -20)]
TOP_HZ = 15900  # band limit


def record(dry):
    """The right microphone port resonates near 1 kHz and is brighter; peaks clip, then the band is cut."""
    def ports(hz):
        lean = amp(along(MICROPHONE_LEAN, hz) * np.array([[.5], [-.5]]))
        return lean / np.sqrt(np.mean(lean ** 2, axis=0))  # same total power at every frequency
    return filtered(np.clip(filtered(dry, ports), -1, 1), lambda hz: hz < TOP_HZ)


dry = scene()
out = record(dry)
unload_audio(out)
```